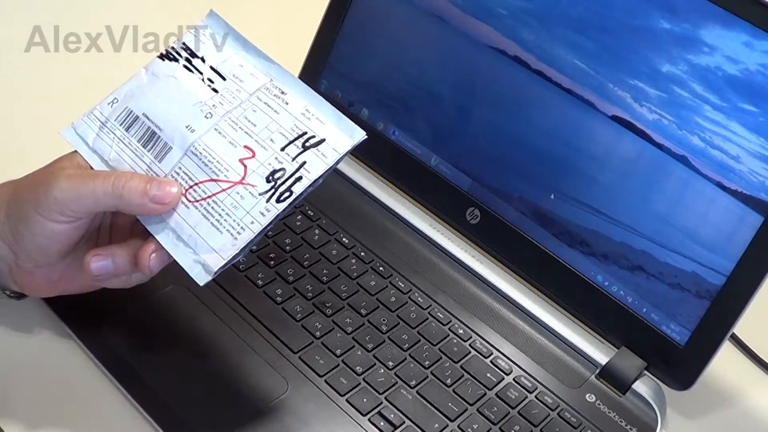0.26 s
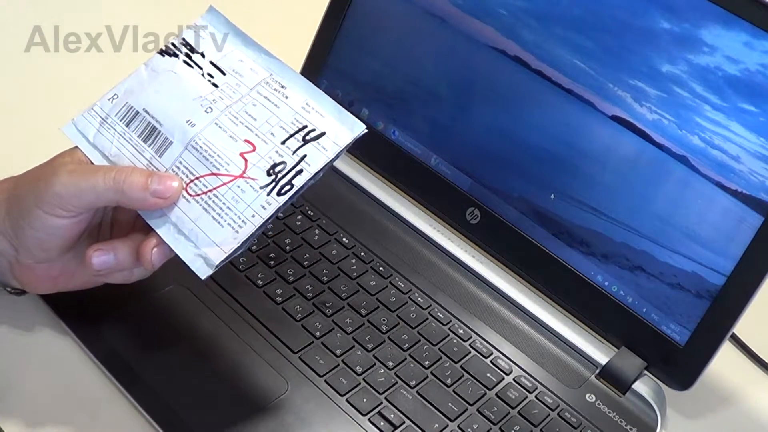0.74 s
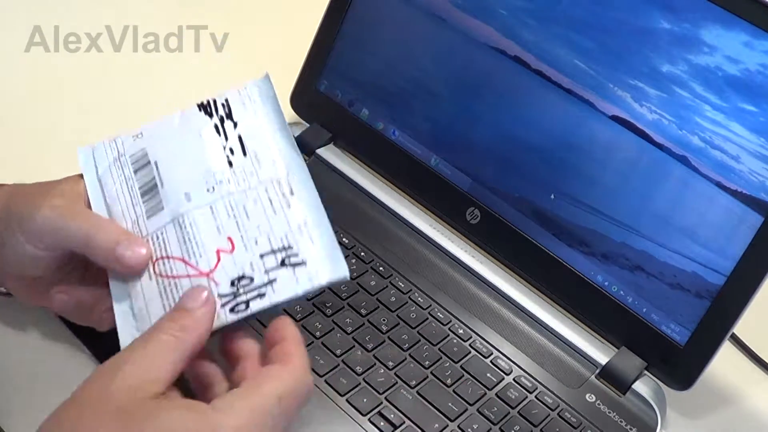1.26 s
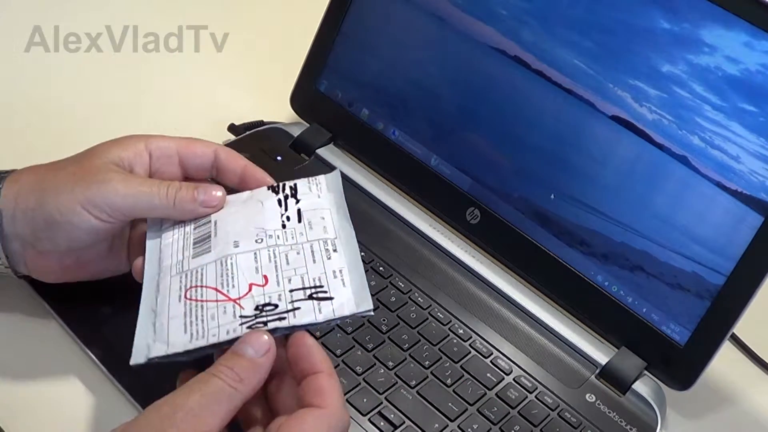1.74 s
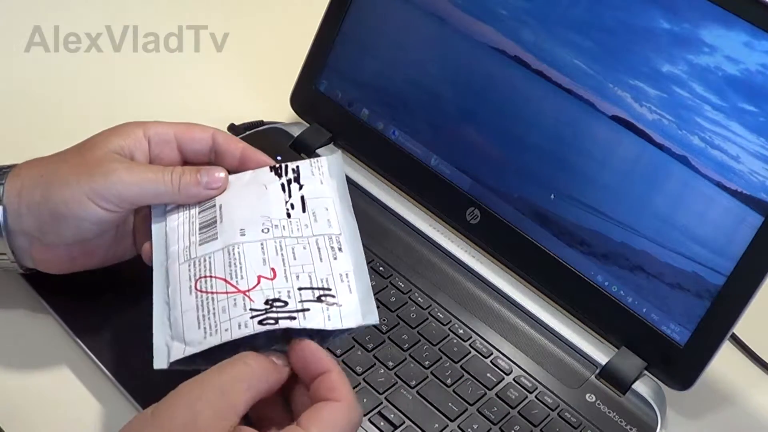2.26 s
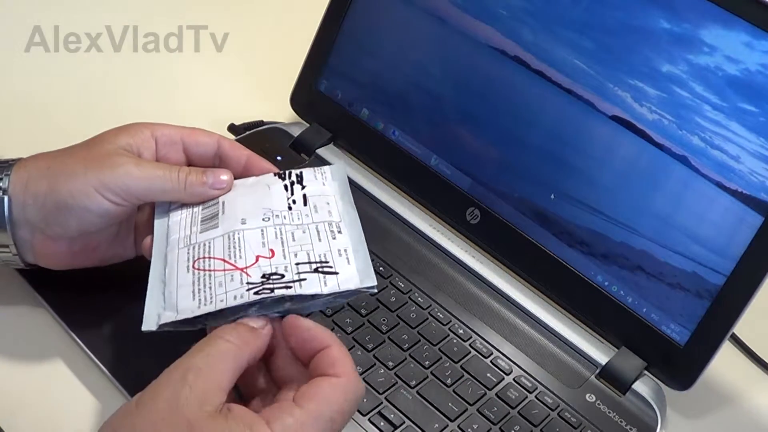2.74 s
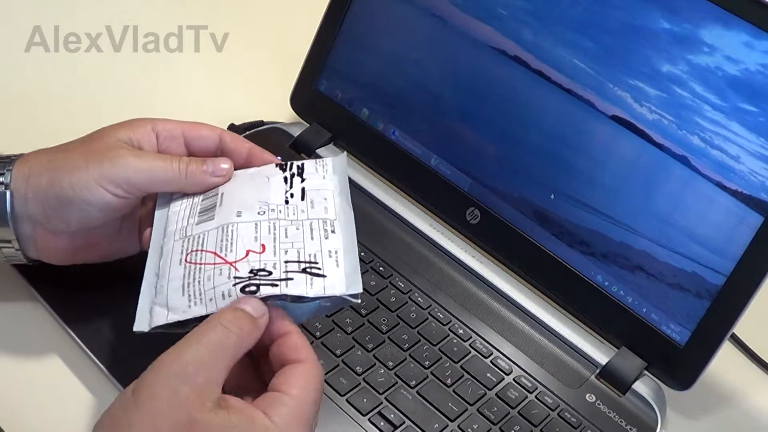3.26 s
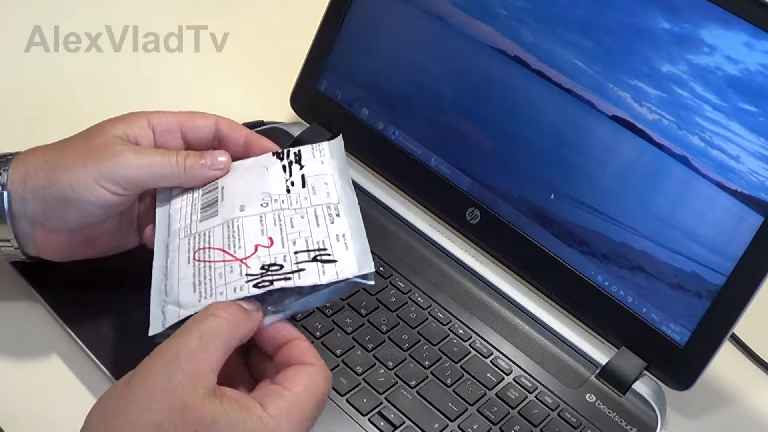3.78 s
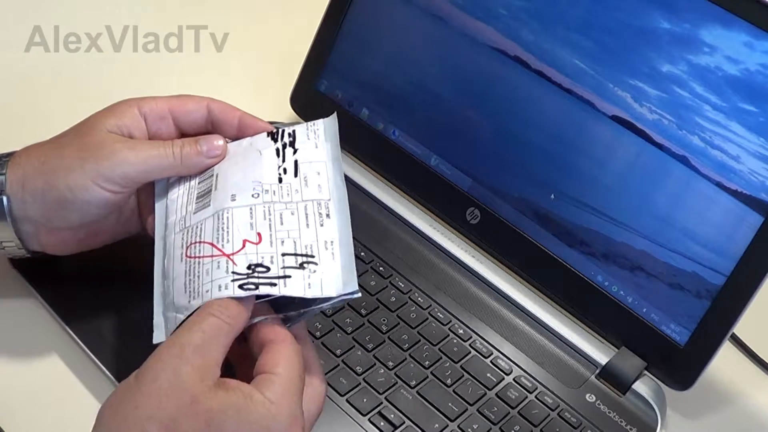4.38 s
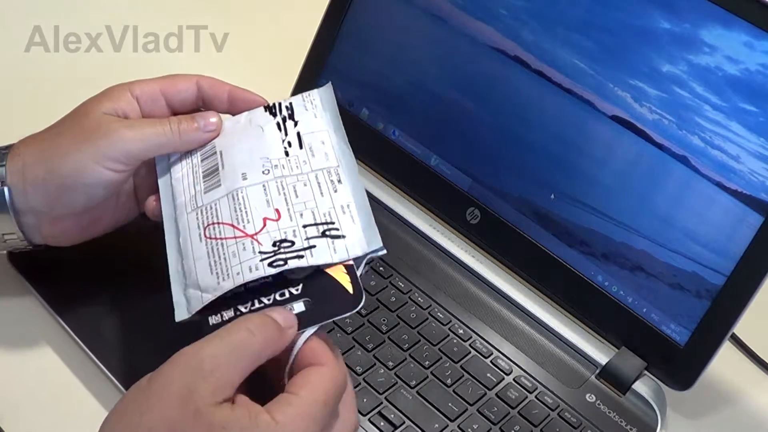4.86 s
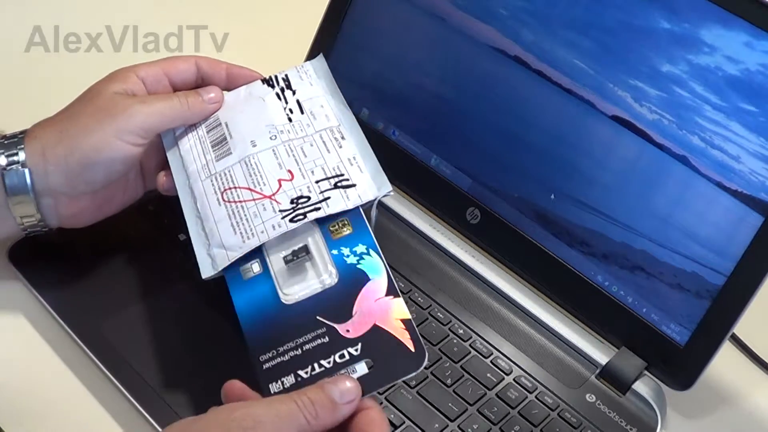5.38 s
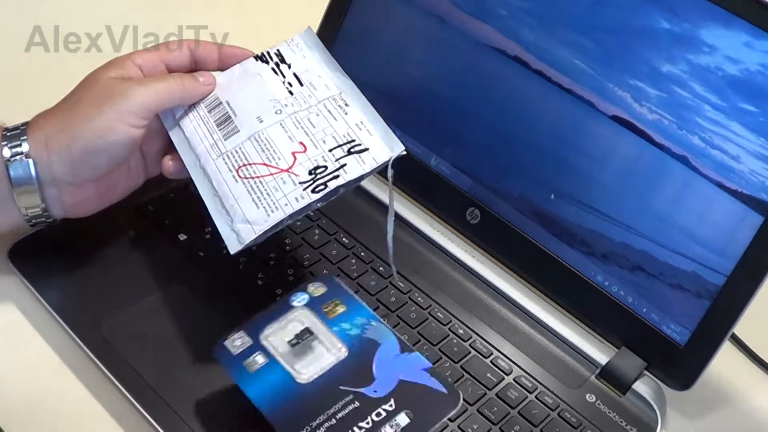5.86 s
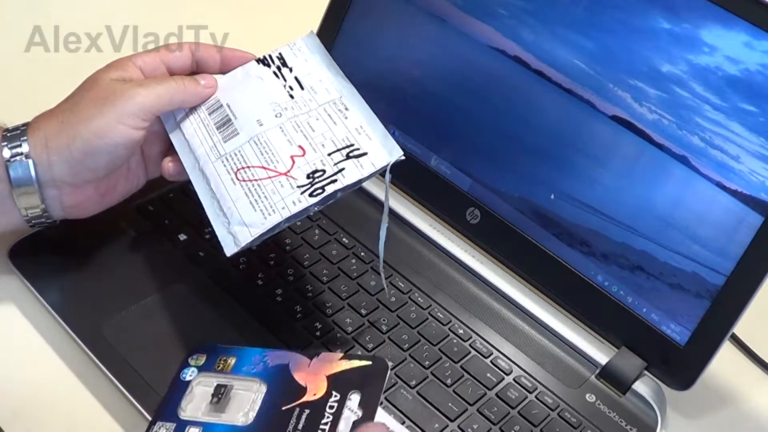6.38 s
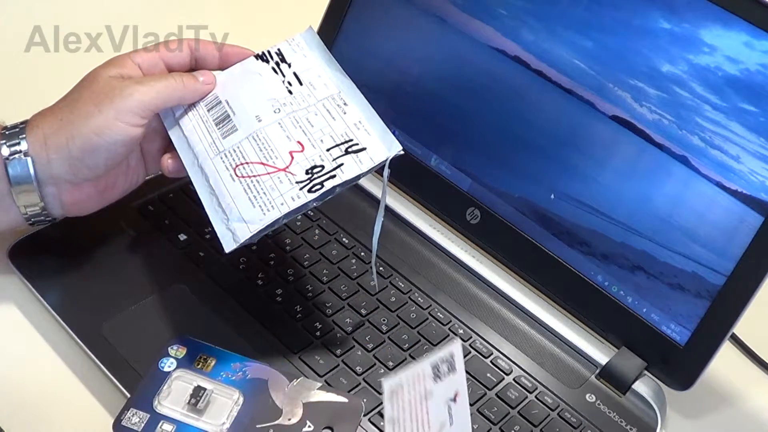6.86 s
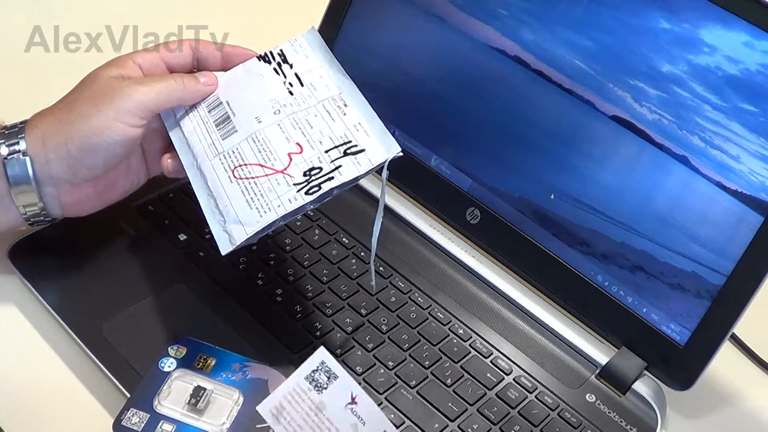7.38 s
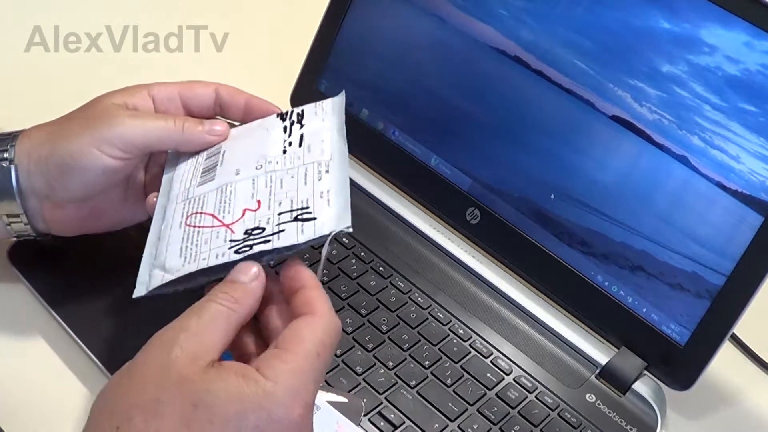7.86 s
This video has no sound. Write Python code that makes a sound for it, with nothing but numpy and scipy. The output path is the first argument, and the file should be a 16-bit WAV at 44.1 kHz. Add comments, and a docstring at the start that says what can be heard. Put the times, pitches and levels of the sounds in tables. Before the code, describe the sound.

Throughout, a soft laptop fan, barely audible mains hum, very high thin whine and a faint fluttering motor buzz lie beneath close, slightly roomy desk sounds. At 0 s a heavy object knocks farther away: a fast cluster of dull, woody thuds with a short rattle, gone by about 0.3 s. Near quiet follows until 1.3 s, when fingers scuff and crinkle a padded plastic mailer. Sharp, dry snaps come irregularly, strong around 2.65, 3.2 and 3.5 s, densest from 3.9 to 4.4 s, with low flexing of the sheet. From 4.7 s crackling gives way to smooth hissing as a stiff card slides out. At 6.25 s it clacks down brightly, bouncing twice quickly with a loose rattle. A short scrape at 6.8 s and papery swishes around 7.4 s follow; small crackles return near 8 s.

```python
"""Hands open a padded plastic mailer above a laptop: creases snap as impulses that flex the sheet, over rustling film.
A blister card slides out by stick-slip friction, taps down and bounces as a struck plate; a paper slip is moved.
A heavy knock opens the scene: noise hits and decaying room modes, with early reflections and reverberation throughout
the foreground. Underneath lie the laptop's fan noise, mains hum, a thin gated line-scan whine and a focus motor."""
import sys
import numpy as np
from scipy import signal
from scipy.fft import rfft, irfft, next_fast_len
from scipy.io import wavfile
from scipy.ndimage import uniform_filter1d, map_coordinates

SR = 44100
rng = np.random.default_rng(int(sys.argv[2]) if len(sys.argv) > 2 else 0)


def wav_record(signal):
    """Record a signal, one row per channel, as 16-bit PCM in the file named by sys.argv[1]."""
    frames = np.transpose(np.atleast_2d(signal))
    bounded = np.clip(frames, -1, 1)
    # unit amplitude maps onto the largest positive 16-bit level
    quanta = np.round(bounded * 32767).astype(np.int16)
    wavfile.write(sys.argv[1], SR, quanta)


N = 358533
TIME = np.arange(N) / SR
SHORT = np.arange(8192) / SR  # time axis of one short hit, s
MAINS_HZ = 50

# Level columns are relative: each layer adds its own gain, and stereo, room and band limit follow.
# Buckling creases: start_s, crack_db, flex_db, colour_hz (steers the peak of the crack's spectrum)
CREASES = [(0.0745, -41.5, -37, 9400), (1.398, -37, -47, 8800), (1.4226, -35, -42, 5750),
           (1.429, -36, -62, 9000), (1.4596, -33, -40, 7750), (1.6253, -40, -42.5, 5100),
           (1.6488, -38, -50, 9600), (1.6727, -38.5, -47, 8400), (1.681, -35, -58, 8400),
           (1.74, -36, -39, 7700), (1.8074, -49.5, -48, 9900), (1.904, -44.5, -78, 4940),
           (1.9972, -39, -65, 9500), (2.004, -39, -47, 7760), (2.0238, -42, -52, 8600),
           (2.046, -34.5, -62, 8550), (2.0664, -28, -46.5, 8500), (2.087, -33.5, -52, 7060),
           (2.161, -39.5, -71, 10200), (2.1792, -38.5, -68, 8500), (2.1909, -32, -38, 7200),
           (2.234, -40, -59, 7200), (2.2432, -36.5, -40.5, 5760), (2.3087, -40, -60, 7900),
           (2.329, -30.5, -40, 9000), (2.6374, -28.5, -46, 8200), (2.653, -21, -37.5, 7840),
           (2.6752, -39, -40.5, 7450), (2.8963, -47, -50, 9000), (2.9267, -28.5, -36.5, 8700),
           (2.9608, -32.5, -47, 7950), (3.0656, -38.5, -51, 9800), (3.1272, -38.5, -47, 7060),
           (3.177, -43, -44, 5100), (3.208, -39, -46, 7400), (3.22, -22, -40, 7450),
           (3.228, -44, -45.5, 6330), (3.3186, -47, -45, 5760), (3.332, -42, -55, 6900),
           (3.3527, -35, -43, 8400), (3.3705, -41, -46.5, 7000), (3.456, -43.5, -41.5, 6460),
           (3.5225, -42, -59, 6500), (3.543, -25.5, -34.5, 7950), (3.6215, -30.5, -39.5, 8250),
           (3.6468, -43, -58, 8100), (3.687, -37, -65, 9400), (3.707, -40, -52, 7600),
           (3.7316, -37, -65, 8900), (3.8125, -35, -67, 7360), (3.941, -33, -40.5, 7600),
           (3.9527, -26, -40.5, 8600), (3.96, -29.5, -39.5, 7240), (3.9653, -27.5, -54, 8900),
           (3.9819, -24, -34.5, 4570), (4.0273, -31, -43, 7960), (4.0603, -33.5, -49, 8150),
           (4.0759, -36, -46.5, 9050), (4.085, -32.5, -45, 6500), (4.0912, -30.5, -42, 7100),
           (4.099, -38.5, -60, 10000), (4.1593, -41, -66, 9000), (4.1808, -29.5, -51, 7900),
           (4.1873, -27, -36.5, 7500), (4.2116, -27, -39.5, 7260), (4.2341, -48, -38, 4600),
           (4.2476, -41, -43, 8000), (4.2632, -36, -41.5, 6800), (4.2718, -39, -41, 7750),
           (4.322, -27.5, -37.5, 6440), (4.4134, -41.5, -57, 8700), (4.4937, -48, -73, 8040),
           (4.553, -44, -67, 10600), (4.598, -38.5, -52, 10100), (4.627, -43, -40.5, 5970),
           (4.773, -43, -69, 4850), (4.88, -42.5, -57, 6360), (7.9303, -40, -70, 9200),
           (7.971, -46, -60, 8800), (8.024, -45.5, -70, 9300), (8.1024, -35, -39, 7460)]
# Spectrum of the bending padded sheet: frequency_hz, level_db
FLEX_SPECTRUM = [(100, -16), (250, -18), (450, -4), (1000, 2), (1800, 6), (2600, 2), (4000, 0.5),
                 (8000, -67)]
# Spectrum of rustling film: frequency_hz, level_db
RUSTLE_SPECTRUM = [(1200, -8), (2800, -7), (4200, -3), (5500, -2.5), (7500, 0), (10000, 4), (12000, -4),
                   (15000, -9.5)]


def amp(db):
    """Amplitude ratio of a level: twenty decibels are a factor of ten."""
    return 10 ** (np.asarray(db) / 20)


def unit(x):
    """Normalise mean power: scale to rms 1."""
    return x / np.sqrt(np.mean(x ** 2) + 1e-20)


def burst(x):
    """Normalise energy: scale a hit to that of 4 ms at rms 1."""
    return x * np.sqrt(.004 * SR / np.sum(x ** 2))


def along(points, hz):
    """Logarithmic frequency scale: interpolate (frequency_hz, value) points along it."""
    f, v = np.transpose(points)
    return np.interp(np.log(hz + 1), np.log(f), v)


def filtered(x, response):
    """Linear filtering: multiply the spectrum by a response of frequency."""
    m = next_fast_len(N + SR // 2)
    return irfft(rfft(x, m) * response(np.fft.rfftfreq(m, 1 / SR)), m)[..., :N]


def coloured(x, spectrum):
    """Spectral shaping: give a long signal a spectrum, at rms 1."""
    return unit(filtered(x, lambda hz: amp(along(spectrum, hz))))


def struck(x, gain_db):
    """Minimum-phase response: filter a short hit causally by a dB gain of frequency."""
    size = len(x)
    cepstrum = irfft(np.log(amp(gain_db(np.fft.rfftfreq(size, 1 / SR))) + 1e-6))
    # folding the cepstrum onto positive times makes the filter causal
    cepstrum[1:size // 2] *= 2
    cepstrum[size // 2 + 1:] = 0
    return burst(irfft(rfft(x) * np.exp(rfft(cepstrum))))


def puff(t60):
    """Exponential decay: noise that starts at once and falls 60 dB per t60 seconds."""
    return rng.standard_normal(len(SHORT)) * amp(-60 * SHORT / t60)


def crack_of(t60, jolt):
    """Impulsive excitation: one clean jolt on top of a decaying puff of noise."""
    x = puff(t60)
    x /= np.linalg.norm(x)
    x[0] += jolt
    return x


def add(track, s, hit):
    """Superposition: mix a hit into the track at time s."""
    start = max(round(s * SR), 0)
    part = track[start:start + len(hit)]
    part += hit[:len(part)]


def wobble(rate):
    """Slow random modulation: a smooth curve through random knots, rate of them a second."""
    return map_coordinates(rng.standard_normal(int(N * rate / SR) + 4), [TIME * rate])


def crackles(rate, spread_db, t60=0.002, scatter_oct=1.0, focus_db=7, centre_hz=6000):
    """Crackling noise: tiny buckles at random moments, each of its own size and colour, many weak and few strong."""
    count, size = int(rate * N / SR), 256
    when, strength, pitch = rng.random((count, 3)).T
    # distance in octaves from each pop's own centre
    octaves = np.log2((np.fft.rfftfreq(size, 1 / SR) + 1) / centre_hz) - scatter_oct * (2 * pitch[:, None] - 1)
    noise = rfft(rng.standard_normal((count, size)))
    pops = irfft(noise * amp(-focus_db * octaves ** 2)) * amp(-60 * SHORT[:size] / t60)
    sizes = amp(-spread_db * np.log(strength + np.exp(-3)))
    pops *= (sizes / np.linalg.norm(pops, axis=1))[:, None]
    places = (when * N).astype(int)[:, None] + np.arange(size)
    return unit(np.bincount(places.ravel(), pops.ravel(), N)[:N])


def friction(spectrum, grain_db=-3, flutter_db=1.4):
    """Stick-slip friction: fine slips over a smooth rub, under a wavering pressure."""
    slips = amp(grain_db) * crackles(rate=900, spread_db=7.5)
    return coloured((rng.standard_normal(N) + slips) * amp(flutter_db * wobble(90)), spectrum)


def strokes(rows, column):
    """Speed-dependent friction: gain per sample, Gaussian strokes 20 dB down after their rise or fall time."""
    power = np.zeros(N)
    for row in rows:
        s, rise, fall = row[:3]
        power += amp(row[column] - 20 * ((TIME - s) / np.where(TIME < s, rise, fall)) ** 2) ** 2
    return np.sqrt(power)


def effort():
    """Amplitude envelope: gain per sample of the hands' work, silent before and after it."""
    # How hard the hands work the film: time_s, effort_db
    work = [(1.33, -68), (1.42, -56), (1.88, -61.5), (2.1, -55), (2.82, -68), (3.1, -54), (4.1, -53),
            (4.42, -58), (4.7, -53.5)]
    return amp(np.interp(TIME, *np.transpose(work), left=-np.inf, right=-np.inf))


def unrest(gather_s=0.014, settle_s=0.032):
    """Clustered buckling: gain per sample of the small creases around snaps, in step with each flex."""
    power, t = np.zeros(N), np.arange(-SR // 8, SR // 2) / SR
    shape = np.exp(-2 * np.abs(t / np.where(t < 0, gather_s, settle_s)))
    for s, _, sheet_db, _ in CREASES:
        # a snap too early to hold its whole lead-in is left out
        if s + t[0] > 0:
            add(power, s + t[0], amp(sheet_db) ** 2 * shape)
    return np.sqrt(power)


def spread(pair, side_db):
    """Mid-side stereo: two unrelated signals become the sum and difference of two channels."""
    mid, side = pair[0], amp(side_db) * pair[1]
    return np.array([mid + side, mid - side])


def room(x, side_db, delay=.009):
    """Reverberation: after a short gap the walls answer, each frequency decaying at its own rate."""
    # Decay of the room: frequency_hz, t60_s
    decay = [(100, 0.53), (400, 0.33), (1500, 0.42), (6000, 0.22), (14000, 0.033)]
    hz, t, z = signal.stft(rng.standard_normal((2, SR // 2)), SR, nperseg=256)
    tail = signal.istft(z * amp(-60 * t / along(decay, hz)[:, None]), SR, nperseg=256)[1]
    tail = np.pad(tail / np.linalg.norm(tail[0]), ((0, 0), (round(delay * SR), 0)))
    return spread(signal.fftconvolve(x[None], tail, axes=1)[:, :N], side_db)


def desk(x, t60=0.029, side_db=-6):
    """Early reflection: desk, screen and hands return a sparse scatter of decaying copies."""
    copies = np.array([puff(t60), puff(t60)])
    copies *= (rng.random((2, len(SHORT))) < .1) * (SHORT > .001)
    return spread(signal.fftconvolve(x[None], copies / np.linalg.norm(copies[0]), axes=1)[:, :N], side_db)


def background(fan_db=-59, side_db=-11, hum_db=-77, whine_db=-61, whine_pan_db=4.5, scan_hz=15625):
    """Steady sources: broadband fan noise, a pure mains hum, and a scan tone gated off once every mains cycle."""
    # Spectrum of the laptop's fan: frequency_hz, level_db
    fan_spectrum = [(20, -25), (70, -5), (105, -1.5), (190, -1.5), (240, 1), (330, -2), (550, -2.5),
                    (780, -1.5), (1300, -6), (2100, -6.5), (2900, -8), (9500, -9), (11500, -12),
                    (15500, -16)]
    fan = amp(fan_db) * coloured(rng.standard_normal((2, N)), fan_spectrum)
    # silent for the first 22 % of each cycle, with softened edges
    gate = uniform_filter1d(1. * (TIME * MAINS_HZ % 1 > .22), size=30)
    whine = amp(whine_db) * unit(gate * np.sin(2 * np.pi * scan_hz * TIME))
    whine = whine * amp([[whine_pan_db], [-whine_pan_db]])
    hum = amp(hum_db) * unit(np.sin(2 * np.pi * MAINS_HZ * TIME))
    return spread(fan, side_db) + whine + hum


def focus_motor(motor_db=-8, pulse_db=6, first_s=0.022):
    """Forced resonance: noise swelling 25 times a second drives the damped modes of the motor's housing."""
    # Modes of the housing: frequency_hz, width_hz, level_db
    housing = [(2473, 71, -60.5), (3550, 260, -66), (4940, 77, -64)]
    # half the mains frequency
    twitch = unit(amp(pulse_db * np.cos(np.pi * MAINS_HZ * (TIME - first_s))))

    def ring(f):
        """Resonance: the sum of damped second-order modes."""
        return sum(amp(db) * 1j * f * width / (hz ** 2 - f * f + 1j * f * width) for hz, width, db in housing)

    # the first mode's level sets the overall level
    return amp(motor_db + housing[0][2]) * twitch * unit(filtered(rng.standard_normal(N), ring))


def knock(thud_t60=0.17, clack_t60=0.016, thud_db=3.5, boom_db=-3.5):
    """Modal excitation: a heavy bump and rattle across the room wakes long low resonances."""
    # Contacts of the heavy object: start_s, body_db (thud and boom), clack_db
    contacts = [(.0003, -22, -24), (.0052, -26.5, -28), (0.0234, -23, -47), (0.0288, -29.5, -32),
                (.043, -27, -63), (.114, -36, -53)]
    # Long resonances: frequency_hz, level_db, t60_s
    modes = [(198, -3, 0.2), (232, -1, 0.24), (405, -1, 0.3), (435, 0, 0.27), (562, -2, 0.2),
             (613, -14, 0.34), (719, 2, 0.18), (800, -2, 0.2), (935, 7, 0.13), (1080, 2, 0.1)]
    # Spectra of the dull and the bright part: frequency_hz, level_db
    thud_spectrum = [(30, -38), (60, -14), (120, -8), (190, -4), (400, -2), (750, 0), (1100, -6.5),
                     (2000, -11), (3000, -20), (8000, -37.5)]
    clack_spectrum = [(500, 2), (1500, -21), (4000, 2.5), (6500, 2.5), (10000, -5.5), (15000, -17)]
    out = np.zeros(N)
    t = np.arange(SR // 2) / SR
    for s, db, clack_db in contacts:
        boom = sum(amp(mode_db - 60 * t / t60) * np.sin(2 * np.pi * (hz * t + rng.random()))
                   for hz, mode_db, t60 in modes)
        add(out, s, amp(db + boom_db) * burst(boom))
        add(out, s, amp(db + thud_db) * struck(puff(thud_t60), lambda hz: along(thud_spectrum, hz)))
        add(out, s, amp(clack_db) * struck(puff(clack_t60), lambda hz: along(clack_spectrum, hz)))
    return out


def taps(click_t60=0.0069, attack=0.0014, jolt=2.1, chatter_db=-11.5, chatter_t60=0.29, chatter_per_s=1600):
    """Struck plate: the card's edge clicks on the laptop, its modes ring briefly and the loose blister chatters."""
    # Light taps of the card: start_s, click_db, ring_db, pitch_hz
    contacts = [(0.497, -68, -50.5, 1240), (5.8145, -60, -59, 1510), (6.249, -22.5, -24.5, 1520),
                (6.301, -29.5, -29.5, 1494), (6.3263, -40, -37.5, 1540), (6.449, -53.5, -46.5, 1510),
                (6.5949, -50, -51.5, 1630), (7.2689, -69, -49, 730), (7.2723, -70, -53, 1440),
                (7.321, -67, -53.5, 1500)]
    # Modes of the card: frequency_ratio (multiple of the pitch), level_db, t60_s
    modes = [(0.113, -32.5, 0.16), (.68, -12, 0.024), (.88, 0.5, 0.012), (1.03, 6, 0.013), (1.2, -2, 0.011),
             (1.45, -9.5, 0.016), (1.8, -11.5, 0.014)]
    # Spectra of the click and of the chattering blister: frequency_hz, level_db
    click_spectrum = [(300, -38), (1500, -29), (3000, -17.5), (5500, -6), (6600, -9), (7700, 1.5),
                      (9900, 2), (10400, -3), (11700, -3.5), (12700, -18), (15000, -25)]
    chatter_spectrum = [(60, -35), (200, -11), (700, -9), (1300, -4), (2400, 1), (3300, -8), (6000, -12),
                        (13000, -32)]
    out = np.zeros(N)
    for s, click_db, ring_db, pitch_hz in contacts:
        # mode levels vary a little from tap to tap
        ring = sum(amp(db + rng.normal() - 60 * SHORT / t60) * np.sin(2 * np.pi * pitch_hz * ratio * SHORT)
                   for ratio, db, t60 in modes)
        add(out, s, amp(ring_db) * burst(ring * (1 - np.exp(-SHORT / attack))))
        click = struck(crack_of(click_t60, jolt), lambda hz: along(click_spectrum, hz))
        add(out, s, amp(click_db) * click)
        chatter = puff(chatter_t60) * (rng.random(len(SHORT)) < chatter_per_s / SR)
        add(out, s, amp(ring_db + chatter_db) * struck(chatter, lambda hz: along(chatter_spectrum, hz)))
    return out


def sliding(hiss_db=-1):
    """Sliding friction: card and paper hiss and rub; dragging also sounds the card's own resonance."""
    # Slides of card and paper: top_speed_s, rise_s, fall_s, hiss_db, rub_db
    slides = [(4.77, 0.08, 0.048, -57, -53), (4.86, 0.21, 0.21, -46.5, -54), (5.03, .17, 0.17, -48, -53.5),
              (5.19, 0.11, 0.23, -53, -61.5), (5.455, 0.22, 0.055, -55, -66), (5.55, 0.12, 0.065, -56, -59),
              (5.9, 0.23, 0.053, -60, -70), (6.04, 0.019, 0.062, -58, -75), (6.185, 0.063, .11, -46, -64),
              (6.65, 0.13, .15, -56.5, -61.5), (6.77, 0.069, 0.027, -39.5, -44),
              (7.39, .042, 0.066, -43.5, -59), (7.45, 0.062, .09, -60, -56),
              (7.53, 0.03, 0.025, -48.5, -57)]
    # Card dragging in the mailer or on the laptop: top_speed_s, rise_s, fall_s, level_db
    drags = [(1.385, 0.041, .025, -50.5), (5.89, 0.077, 0.081, -57), (6.05, 0.037, 0.09, -58.5),
             (6.15, 0.047, 0.13, -57.5), (6.52, 0.21, 0.1, -58.5), (6.76, 0.21, 0.12, -53.5)]
    # Spectra of hiss, rub and dragged card: frequency_hz, level_db
    hiss_spectrum = [(3000, -21.5), (5500, -8), (7500, -3.5), (9700, -2), (11500, -9), (15000, -19)]
    rub_spectrum = [(150, -11), (500, -6.5), (1200, -5), (2200, 0), (2800, -1.5), (4200, 3.5), (5500, -4.5),
                    (8000, -85)]
    drag_spectrum = [(150, -26), (700, -11), (1150, -4), (1520, -1), (1850, -7.5), (3000, -17), (6000, -20)]
    hiss = amp(hiss_db) * strokes(slides, column=3) * friction(hiss_spectrum)
    rub = strokes(slides, column=4) * friction(rub_spectrum)
    drag = strokes(drags, column=3) * friction(drag_spectrum)
    return hiss + rub + drag


def bumps(t60=0.04, focus_db=14):
    """Damped resonance: a touch on film, padding, card or laptop rings briefly around one pitch."""
    # Short pitched knocks and ticks: start_s, level_db, pitch_hz
    touches = [(1.56, -46, 2560), (1.635, -49, 412), (2.0, -50.5, 383), (3.3184, -43, 2000),
               (3.35, -48, 577), (3.543, -43.5, 627), (5.815, -51, 4300), (3.706, -45, 625),
               (4.2325, -40, 480), (4.262, -45.5, 450), (4.632, -48.5, 885), (1.81, -46, 1220),
               (6.251, -48, 180), (6.258, -49, 335), (6.305, -49, 380), (7.27, -48, 726), (8.102, -53, 420)]
    out = np.zeros(N)
    for s, db, pitch_hz in touches:
        peak = lambda hz: np.maximum(-focus_db * np.log2((hz + 1) / pitch_hz) ** 2, -50)
        add(out, s, amp(db) * struck(puff(t60), peak))
    return out


def scuffs():
    """Stick-slip friction: short brushing strokes, one just after the knock, then fingers scuffing the film."""
    # Brushing strokes: start_s, length_s, level_db
    rows = [(0.137, 0.083, -50), (1.343, 0.027, -49.5), (1.382, 0.036, -43.5), (1.411, .1, -44.5),
            (1.568, .035, -45.5), (1.658, 0.036, -42.5), (1.98, 0.02, -39.5), (2.36, 0.028, -49),
            (2.474, .055, -48), (2.528, 0.1, -51), (3.017, 0.13, -46), (3.164, 0.047, -48.5),
            (3.477, 0.079, -44), (3.618, 0.054, -39.5), (3.683, 0.079, -44.5), (3.814, 0.064, -43),
            (3.868, 0.1, -39), (4.138, 0.062, -48), (4.274, 0.061, -41), (7.919, 0.047, -46),
            (8.077, 0.049, -53)]
    stroke = np.zeros(N)
    for s, length, db in rows:
        add(stroke, s, amp(db) * np.sqrt(np.hanning(round(length * SR))))
    return stroke * friction(RUSTLE_SPECTRUM, grain_db=-4.5)


def ticks(tick_db=-4, rate=28):
    """Isolated buckling: lone small creases pop at random while the hands work."""
    pops = crackles(rate=rate, spread_db=2.0, t60=0.025, scatter_oct=0.94, centre_hz=7600)
    return amp(tick_db) * effort() * coloured(pops, RUSTLE_SPECTRUM)


def crinkle(crisp_db=-1, flex_db=-5, rub_db=-8, flutter_db=2.5, flex_grain_db=-2,
            settle_crisp_db=-16, settle_flex_db=-17):
    """Crackling noise: small creases over finger rub, and lower sheet flexing, follow effort and flare at snaps."""
    pressure = amp(flutter_db * wobble(45))
    crisp_rub, flex_rub = amp(rub_db) * rng.standard_normal((2, N))
    crisp_grain = crackles(rate=410, spread_db=2, centre_hz=6400)
    crisp = coloured(crisp_rub + crisp_grain, RUSTLE_SPECTRUM)
    flex_grain = amp(flex_grain_db) * crackles(rate=420, spread_db=1.5, t60=0.0062, centre_hz=1360)
    flex = coloured(flex_rub + flex_grain, FLEX_SPECTRUM)
    work, settling = effort(), unrest()
    # the two causes add in power
    crisp_gain = np.hypot(amp(crisp_db) * work, amp(settle_crisp_db) * settling)
    flex_gain = np.hypot(amp(flex_db) * work, amp(settle_flex_db) * settling)
    return pressure * (crisp_gain * crisp + flex_gain * flex)


def snaps(echo_s=.0011, echo_db=-9, crack_t60=0.0092, jolt=0.86, flex_t60=0.013, lead_s=0.0013, lead_db=-25,
          ring_db=-19, ring_t60=0.013, focus_db=6):
    """Snap-through buckling: a crease cracks and flexes the sheet; the laptop reflects the crack."""
    # Spectrum of the cracking film: frequency_hz, level_db
    film_spectrum = [(1200, -37.5), (2800, -7), (4200, -1.5), (5500, -6), (7500, -1.5), (10000, 0),
                     (12000, -7), (15000, -10.5)]
    out = np.zeros(N)
    lead = round(lead_s * SR)
    for s, db, sheet_db, colour_hz in CREASES:
        crack = np.roll(crack_of(crack_t60, jolt) + amp(ring_db) * crack_of(ring_t60, 0), lead)
        # faint noise swells for about a millisecond before the jolt
        lead_gain = amp(lead_db + rng.normal(0, 1.7))
        crack[:lead] += lead_gain * rng.standard_normal(len(SHORT))[:lead] * np.linspace(0, 1, lead) ** 2
        # a single reflection about a millisecond later
        crack += amp(echo_db) * np.roll(crack, round(echo_s * rng.uniform(.5, 1.3) * SR))
        octaves = lambda hz: np.log2((hz + 1) / colour_hz)
        # each crease favours its own pitch: a parabola, 0 dB at colour_hz, peaking at colour_hz ** 2 / 7800
        focus = lambda hz: focus_db * octaves(hz) * (2 * np.log2(colour_hz / 7800) - octaves(hz))
        colour = lambda hz: along(film_spectrum, hz) + focus(hz)
        # the sheet bulges differently each time
        bulge = rng.random()
        sheet = lambda hz: along(FLEX_SPECTRUM, hz) + 4 * np.sin(2 * np.pi * (octaves(hz) + bulge))
        add(out, s - lead / SR, amp(db) * struck(crack, colour))
        add(out, s, amp(sheet_db) * struck(puff(flex_t60), sheet))
    return out


def scene():
    """Direct and reflected sound: hands are close, the card excites the room less, the knock is farther away."""
    film = snaps() + crinkle() + ticks() + scuffs() + bumps() + sliding()
    card, far = taps(), knock()
    radiated = film + amp(-2.5) * card
    # slightly toward the first channel
    direct = (film + card) * amp([[.2], [-.2]])
    hands = direct + amp(-18.0) * desk(radiated) + amp(-14.0) * room(radiated, side_db=-19.5)
    distant = far + amp(-12.0) * room(far, side_db=-15)
    return hands + distant + background() + focus_motor()


def record(dry, top_hz=16100):
    """Frequency-dependent stereo width: a filter on the channel difference; nothing passes above the band limit."""
    # Side gain, wide in the middle range, nearly mono in the highest treble: frequency_hz, gain_db
    width = [(60, 2), (150, 1), (300, 9), (1000, 12), (2200, 10.5), (5000, 9), (9000, 5), (15000, -23)]
    mid = (dry[0] + dry[1]) / 2
    side = filtered((dry[0] - dry[1]) / 2, lambda hz: amp(along(width, hz)))
    return filtered(np.array([mid + side, mid - side]), lambda hz: hz < top_hz)


dry = scene()
out = record(dry)
wav_record(out)
```